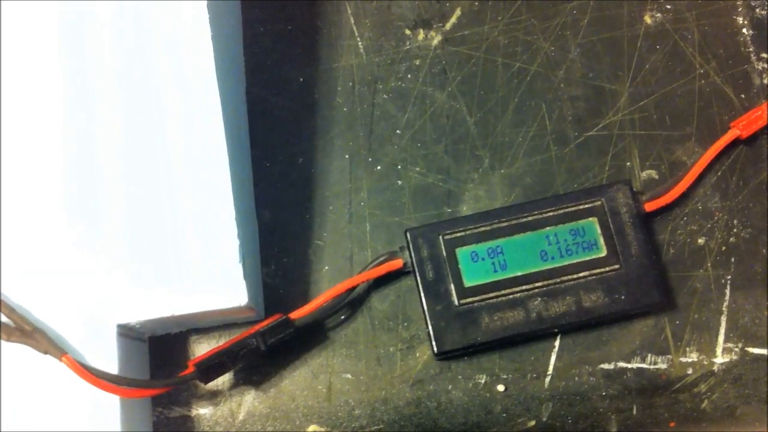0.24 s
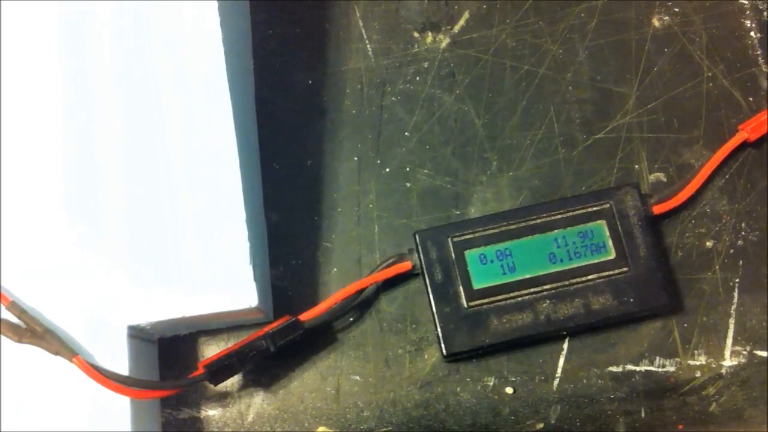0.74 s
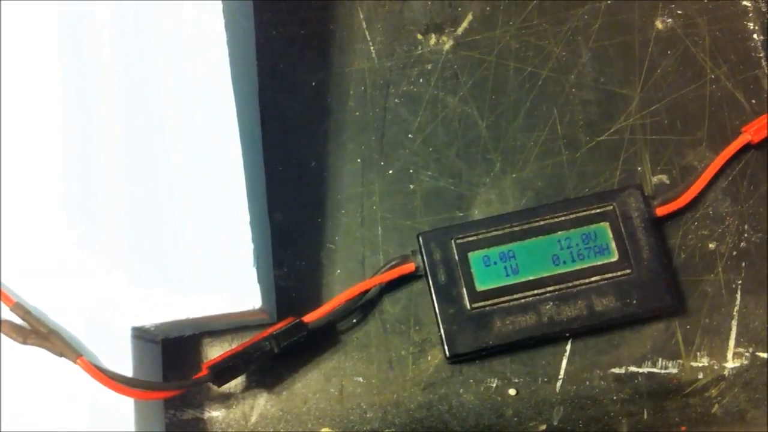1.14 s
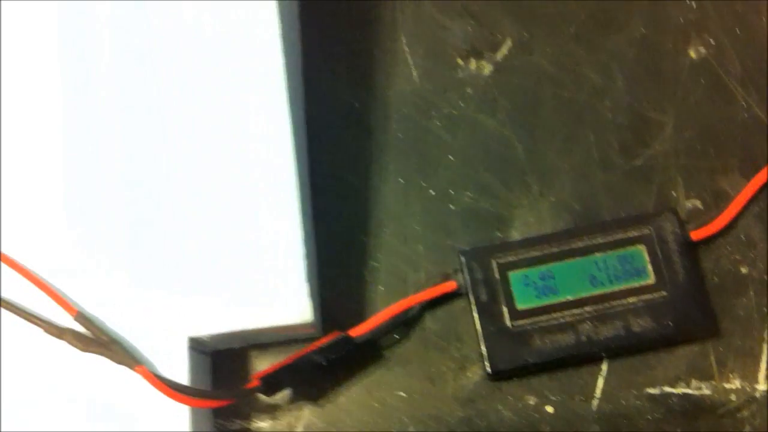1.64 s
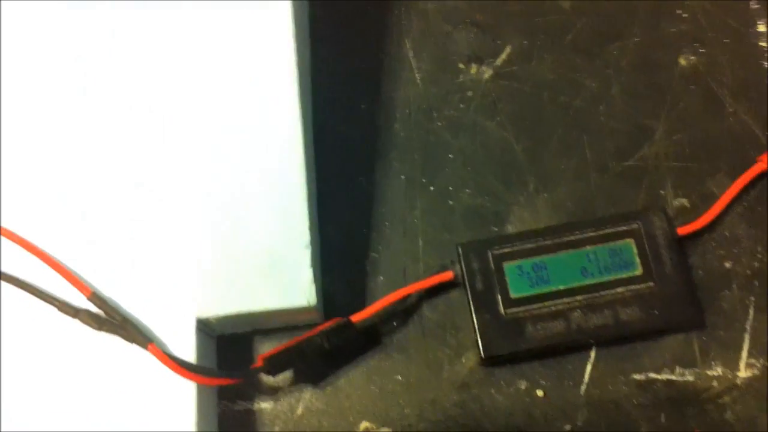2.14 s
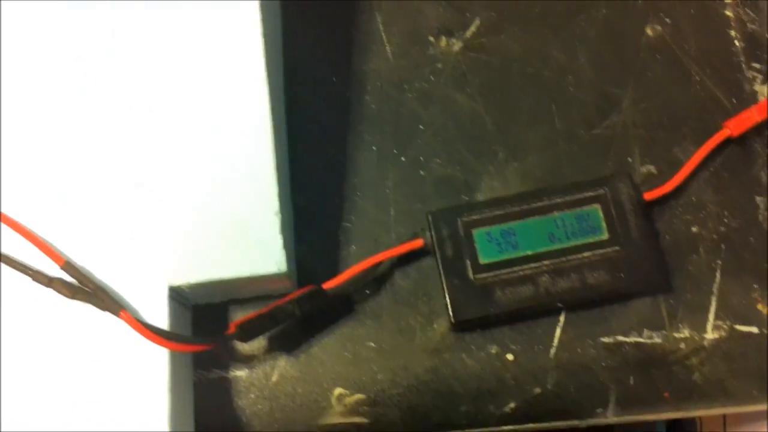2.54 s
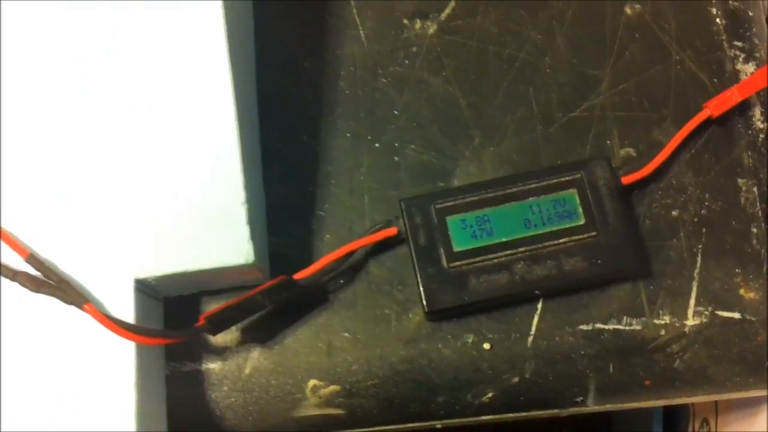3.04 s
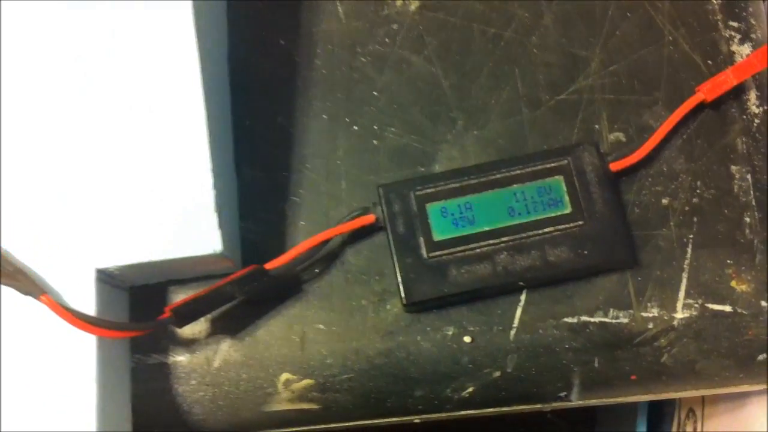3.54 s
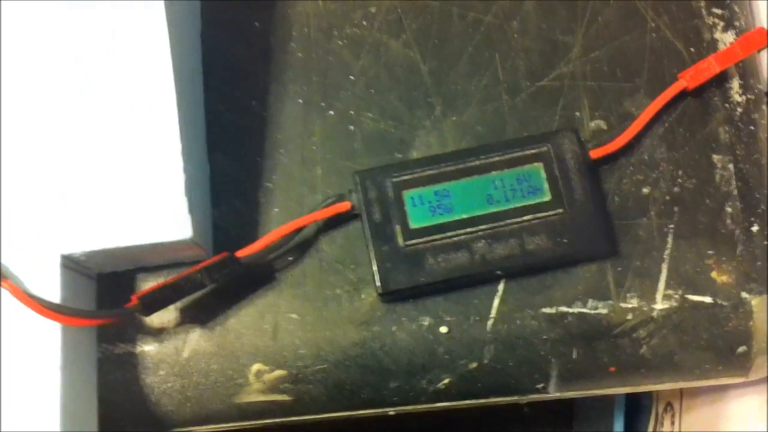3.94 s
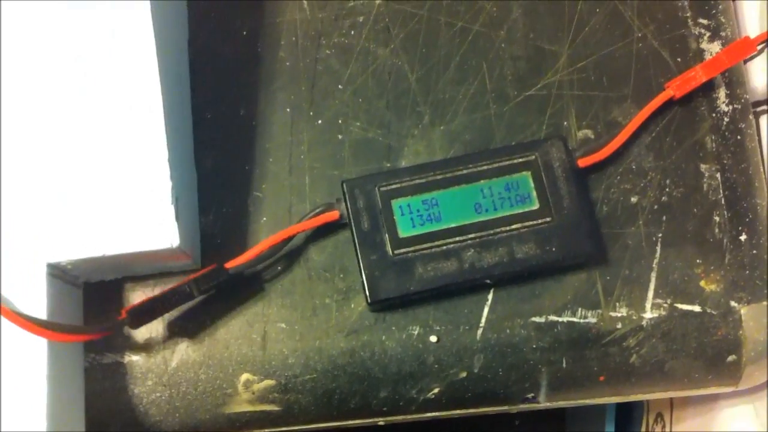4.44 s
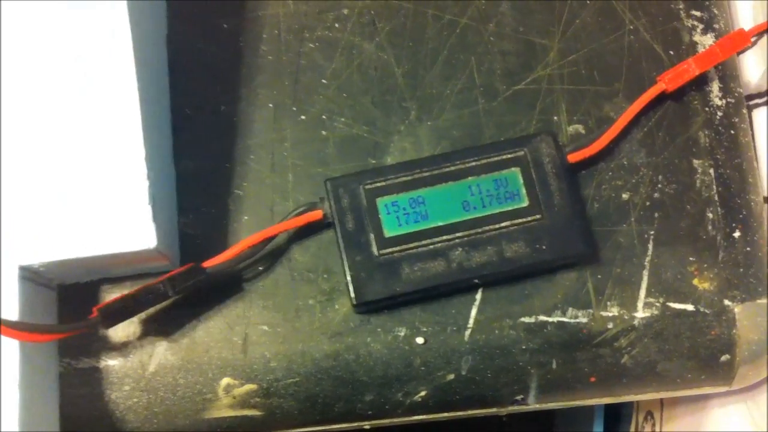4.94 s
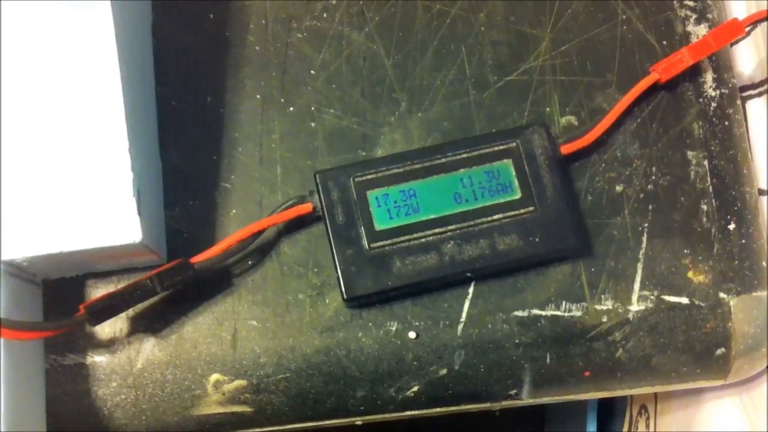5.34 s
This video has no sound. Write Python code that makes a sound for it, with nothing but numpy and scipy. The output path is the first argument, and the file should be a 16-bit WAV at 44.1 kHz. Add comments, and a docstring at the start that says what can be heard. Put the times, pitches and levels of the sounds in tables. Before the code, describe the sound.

A close mono microphone on a workbench catches faint room hum and two light rustles. Then a high controller squeal, a rattling kick and a brief rising growl launch a small ducted fan. It settles into a buzzy whine with airy hiss, then accelerates from about two and a half seconds, growing louder, brighter and windier until the cut, with puffs of air bumping the microphone.

```python
"""A close microphone at a ducted fan on a workbench, in a quiet, faintly humming workshop; a hand brushes twice.
At one second the speed controller squeals, kicks the motor and makes it growl through its housing.
As the ten-blade fan spins up, tones at multiples of the shaft rate emerge and swell as they glide through
resonances of duct and bench. The throttle then opens to full speed: the blades whine over a growing rush of air
made of shaped noise, and late on a few puffs of the wake thud on the microphone."""
import sys
import numpy as np
from scipy import signal
from scipy.fft import rfft, irfft, next_fast_len
from scipy.io import wavfile
from scipy.ndimage import uniform_filter1d, map_coordinates

SR = 44100
rng = np.random.default_rng(int(sys.argv[2]) if len(sys.argv) > 2 else 0)


def unload_audio(sound):
    """Save the sound as a 16-bit wav file, at the path given as the first command line argument."""
    columns = np.transpose(np.atleast_2d(sound))
    # keep every value between -1 and 1, then stretch to whole-number steps
    steps = np.round(np.clip(columns, -1, 1) * 32767)
    wavfile.write(sys.argv[1], SR, steps.astype(np.int16))


N = 246959

# Room noise of the quiet workshop, relative spectrum: f/Hz, density/dB
SHOP_SPECTRUM = [(30, -33), (65, -31), (105, -17), (150, -5), (200, 1), (300, -6.5), (370, -11),
                 (470, -7.5), (750, -16), (930, -12), (1200, -20.5), (4000, -20.5), (10000, -23.5),
                 (15500, -24)]
# Faint hum in the room: f/Hz, level/dB
HUM = [(130, -76.5), (173, -74.5), (198, -68.5)]
# Soft brushing of a hand: t/s, level/dB, length/s
BRUSHES = [(.102, -60.5, 0.02), (.435, -71, .02)]
# Relative spectrum of the brushing: f/Hz, density/dB
BRUSH_SPECTRUM = [(800, -14), (3800, 0), (9000, -8), (14000, -20)]
# Puffs of the fan's wake against the microphone: t/s, level/dB, length/s
PUFFS = [(4.46, -18, 0.011), (4.81, -25.5, 0.043), (5.17, -26, 0.028)]
# Relative spectrum of a puff: f/Hz, density/dB
PUFF_SPECTRUM = [(40, -47), (100, -34), (185, 4), (250, -11), (450, -17), (2000, -63)]
# Lift of air noise and weak blade tones by duct resonances: f/Hz, width/Hz, lift/dB
DUCT = [(940, 51, 3.5), (1068, 350, 6.5), (1668, 450, 6), (2716, 375, 8), (5900, 860, 4.5), (8954, 900, 0)]
# Air roar at low and at full speed, relative spectra before the duct: f/Hz, density/dB
ROAR_SLOW = [(40, -32), (85, -13), (140, 3), (350, 2), (750, 0), (2200, 5.5), (3300, -0.5), (4200, 2),
             (7000, -58)]
ROAR_FAST = [(40, -47), (85, -16.5), (130, -3), (195, 6.5), (350, 0.5), (550, -1.5), (780, -4.5),
             (2200, 0.5), (3300, -1.5), (4200, -3), (7000, -60)]
# Air hiss at low and at full speed, relative spectra before the duct: f/Hz, density/dB
HISS_SLOW = [(1800, -32), (3000, -0.5), (3800, 1.5), (5000, -1), (7200, -2.5), (9000, 0), (11000, -5),
             (14000, -3), (16000, -8.5)]
HISS_FAST = [(1800, -41), (3000, -9), (3800, -2), (5000, -2), (7200, -3), (9000, -2.5), (11000, -3),
             (14000, -3.5), (16000, -8)]
# Kicks that pull the rotor into line, strength before the housing: t/s, level/dB
KICKS = [(1.0255, -36), (1.0572, -29.5), (1.094, -30), (1.13, -15), (1.133, -31)]
# Resonances of motor mount and duct wall: f/Hz, width/Hz, gain/dB
HOUSING = [(217, 84, -15), (585, 142, 0), (1094, 113, 2), (1760, 210, -6), (2610, 310, -4),
           (6260, 1100, -17), (8350, 590, -15)]
# Torque ripple, relative strengths before the housing: multiple of the shaft rate, level/dB
RIPPLE = [(2, -9.5), (3, -5), (4, -10), (6, -4), (7, -26), (8, -1.5), (12, -6), (17, -6), (18, 1), (19, -6),
          (24, -4)]
# Surges of torque while the motor gathers speed: t/s, growl level/dB, length/s
SURGES = [(1.098, -28, 0.0092), (1.122, -18, 0.0056), (1.146, -27, 0.0055), (1.18, -23.5, 0.024),
          (1.305, -27.5, 0.033), (1.43, -34.5, 0.033)]
# Controller's switching tone: t/s, level/dB
SWITCHING = [(1.12, -37), (1.2, -34), (1.3, -38), (1.55, -40.5), (1.9, -29.5), (2.15, -29), (2.4, -32.5),
             (3.3, -33.5), (3.7, -48), (4.4, -27.5), (4.8, -44), (5.6, -30)]
# Switching sidebands: carrier multiple, shaft multiple, level/dB added at the peak of the spin-up,
# level/dB at low speed, level/dB at full speed
SIDEBANDS = [(1, 1, -52, -62, -52), (1, 6, -45, -62, -53), (1, 12, -36.5, -59, -42), (1, 18, -49, -64, -33),
             (1, -18, -42, -60, -58), (2, -18, -57, -53, -52), (2, -6, -50, -55, -56)]
# Resonances of the motor can that the commutation whine glides through: f/Hz, width/Hz, lift/dB
CAN_PEAKS = [(4300, 610, 18), (5200, 250, 7.8), (6025, 780, 18.2)]
# Tones of slightly unequal blades, before the duct: multiple of the shaft rate,
# level/dB re the roar at low speed, level/dB re the roar at full speed
UNEVEN = [(3, -18, -21.5), (4, -21, -24.5), (5, -19.5, -21), (6, -23, -32), (7, -14, -18), (9, -18, -17),
          (11, -43, -39), (17, -20, -18.5), (19, -31, -33), (21, -18, -20), (27, -32, -15), (40, -23, -24)]
# Shaft tones before resonances (1 and 2 unbalance, 6 magnet pull, 20 and 30 blade overtones):
# multiple of the shaft rate, level/dB at full speed, growth/dB per doubling of speed,
# roughness 0-1, flutter width/Hz
TONES = [(1, -32.5, 18, 0.21, 16), (2, -38.5, 13.5, 0.39, 11), (6, -38, 2, 0.19, 27),
         (20, -34.5, 14.5, 0.54, 24), (30, -32, 29, 0.44, 44)]
# Resonances of bench and duct that a shaft tone glides through: f/Hz, width/Hz, lift/dB
TONE_PEAKS = [(123, 19, 17), (156, 7.4, 7), (200, 40, 18.5), (230, 19.6, 11.5), (276.6, 11.3, 10.5),
              (341.5, 27.5, 14.5), (388, 57, 10), (613.4, 24.6, 10.5), (1018, 69, 11), (1145, 150, 12),
              (2580, 440, 13), (3470, 520, 6.5), (4620, 370, 5), (5650, 710, 13.5), (8100, 1200, 5)]
# Blade whine: t/s, level/dB
WHINE = [(1.26, -41), (1.33, -27), (1.42, -48), (1.55, -32.5), (2.1, -27), (2.55, -30.5), (2.68, -31),
         (2.78, -28), (2.85, -35), (3.2, -32.5), (3.53, -32), (3.61, -19), (3.77, -26.5), (3.85, -13.5),
         (3.92, -20), (4.04, -14.5), (4.25, -20.5), (4.42, -11), (4.52, -18.5), (4.79, -15), (4.88, -25.5),
         (5.17, -19), (5.25, -30.5), (5.6, -22)]
# Shaft speed set by the throttle: t/s, shaft rate f/Hz
THROTTLE = [(1.9, 157.5), (2.26, 163), (2.41, 166.7), (2.55, 174.5), (2.7, 184), (2.85, 199.5),
            (3.0, 212.5), (3.15, 226), (3.27, 237), (3.39, 243), (3.61, 257.4), (3.751, 266), (3.96, 274),
            (4.22, 287), (4.41, 294), (4.58, 299.6), (5.049, 305.4), (5.17, 312.5), (5.6, 323)]

SHOP_DB = -63
FULL_SPEED_HZ = 300  # shaft rate to which the growing levels refer
ROAR_DB, ROAR_GROWTH_DB = -19, 15  # at full speed, per doubling of speed
HISS_DB, HISS_GROWTH_DB = -17, 16
MOUNT_CUT_HZ = 210
GROWL_DB = -36  # under steady running
CARRIER_HZ, OCTAVE_DB = 7796.3, -48  # switching rate, level of its octave
POWER_ON_S, POWER_ATTACK_S = 1.025, 0.0025
# louder squeal while the rotor is pulled into line
ALIGN_S, ALIGN_DB, ALIGN_HOLD_S, ALIGN_RELEASE_S = 1.0445, -32, 0.031, 0.013
SPIN_START_S, SPIN_UP_S, SPIN_SHAPE = 1.047, 0.241, 1.34
COMMUTATION_DB = -49  # before the can's resonances
STEPS_PER_TURN = 36  # six pole pairs, six commutation steps each
TONES_START_S, TONES_RISE_S = 1.2, 0.04  # clear tones emerge once the rotor runs smoothly
TONE_CUT_HZ = 155  # the fan is too small to radiate below this
STANDING_WAVE_DB, STANDING_WAVES_PER_OCTAVE = 1.37, 26
TOP_HZ = 15800  # band limit of the microphone


def amp(db):
    """Decibels to gain."""
    return 10 ** (np.asarray(db) / 20)


def unit(x):
    """Scale to rms 1."""
    return x / np.sqrt(np.mean(x ** 2) + 1e-20)


def clock():
    """Time of each sample in seconds."""
    return np.arange(N) / SR


def curve(rows):
    """One value per sample from (s, value) rows."""
    return np.interp(clock(), *np.transpose(rows))


def ramp(start_s, rise_s):
    """Rises from 0 to 1 and stays there."""
    return np.clip((clock() - start_s) / rise_s, 0, 1)


def swells(rows):
    """Bell-shaped envelopes from (s, dB, length s) rows."""
    return sum(amp(db) * np.exp(-0.5 * ((clock() - s) / length) ** 2) for s, db, length in rows)


def along(points, hz):
    """Interpolate (Hz, value) points on a log frequency axis."""
    f, v = np.transpose(points)
    return np.interp(np.log(hz + 1), np.log(f), v)


def lift(hz, peaks):
    """Decibels by which resonances raise a frequency."""
    return sum(db / (1 + (2 * (hz - c) / width) ** 2) for c, width, db in peaks)


def filtered(x, response):
    """Multiply the spectrum of x by a response of frequency."""
    m = next_fast_len(N + SR // 4, True)  # zero padding leaves room for the ringing
    return irfft(rfft(x, m) * response(np.fft.rfftfreq(m, 1 / SR)), m)[:N]


def noise(level_db):
    """Noise of rms 1 with a spectrum given as a function of frequency."""
    return unit(filtered(rng.standard_normal(N), lambda hz: amp(level_db(hz))))


def flutter(width_hz):
    """Random flutter of rms 1: noise through two equal one-pole low-passes."""
    pole = np.exp(-2 * np.pi * width_hz / SR)
    return unit(signal.sosfilt([[1, 0, 0, 1, -2 * pole, pole ** 2]], rng.standard_normal(N)))


def tone(cycles, rough, width_hz):
    """A line of rms about 1 whose strength and phase are randomly shaken."""
    angle = 2 * np.pi * (cycles + rng.random())
    in_phase = (1 + rough * flutter(width_hz)) * np.sin(angle)
    quadrature = rough * flutter(width_hz) * np.cos(angle)
    return (in_phase + quadrature) * np.sqrt(2 / (1 + 2 * rough ** 2))


def spin_up():
    """Share of the throttle's speed reached as the rotor breaks loose and catches up along an S-curve."""
    elapsed = np.maximum(clock() - SPIN_START_S, 0)
    return 1 - np.exp(-(elapsed / SPIN_UP_S) ** SPIN_SHAPE)


def throttle(speed):
    """0 at low speed, 1 near full speed."""
    return np.clip((speed - 165) / 115, 0, 1)


def grown(speed, full_db, growth_db):
    """Gain that grows by a fixed step for each doubling of speed; silent at rest."""
    doublings = np.log2(np.maximum(speed, 1) / FULL_SPEED_HZ)
    return (speed > 0) * amp(full_db + growth_db * doublings)


def workshop():
    """Background: room rumble, a faint hum and a hand brushing something twice."""
    room = amp(SHOP_DB) * noise(lambda hz: along(SHOP_SPECTRUM, hz))
    hum = sum(amp(db) * tone(hz * clock(), rough=0.48, width_hz=5.0) for hz, db in HUM)
    brushing = swells(BRUSHES) * noise(lambda hz: along(BRUSH_SPECTRUM, hz))
    return room + hum + brushing


def wake():
    """Stray puffs of air thud softly on the microphone."""
    return swells(PUFFS) * noise(lambda hz: along(PUFF_SPECTRUM, hz))


def duct_flow(slow_spectrum, fast_spectrum, fast):
    """Turbulence coloured by the duct, crossfaded in power from the low-speed to the full-speed spectrum."""
    slow_flow = noise(lambda hz: along(slow_spectrum, hz) + lift(hz, DUCT))
    fast_flow = noise(lambda hz: along(fast_spectrum, hz) + lift(hz, DUCT))
    return np.sqrt(1 - fast) * slow_flow + np.sqrt(fast) * fast_flow


def air(speed):
    """Turbulent flow through the duct grows louder and changes colour with speed."""
    fast = throttle(speed)
    eddies_db = 0.59 * flutter(8.8)  # slow flutter shared by roar and hiss
    roar = grown(speed, ROAR_DB, ROAR_GROWTH_DB) * amp(eddies_db + 0.93 * flutter(42))
    hiss = grown(speed, HISS_DB, HISS_GROWTH_DB) * amp(eddies_db + 0.32 * flutter(90))
    return roar * duct_flow(ROAR_SLOW, ROAR_FAST, fast) + hiss * duct_flow(HISS_SLOW, HISS_FAST, fast)


def housing(hz):
    """Complex response of the mount and duct wall, which are too small to radiate deep bass."""
    modes = 0
    for k, (c, width, db) in enumerate(HOUSING):
        sign = (-1) ** k  # neighbouring modes have opposite signs
        modes = modes + sign * amp(db) * 1j * hz * width / (c * c - hz * hz + 1j * hz * width)
    bass_cut = -hz ** 2 / (MOUNT_CUT_HZ ** 2 - hz ** 2 + 1j * hz * MOUNT_CUT_HZ)
    return modes * bass_cut


def kicks():
    """Each current kick knocks the housing: a noise burst that decays by 60 dB in 0.11 s."""
    blows = np.zeros(N)
    for s, db in KICKS:
        age = clock() - s
        blows += (age >= 0) * amp(db - 60 * np.abs(age) / 0.11)
    blows *= rng.standard_normal(N)
    return amp(10.5) * filtered(blows, housing) + amp(-26) * blows


def growl(turns):
    """Torque ripple sweeps up through the housing's resonances, with some rattle."""
    ripple = sum(amp(db) * tone(k * turns, rough=1.0, width_hz=26) for k, db in RIPPLE)
    step_phase = (STEPS_PER_TURN * turns) % 1
    rattle = unit(amp(-14 * step_phase) * rng.standard_normal(N))  # each commutation step jolts loose parts
    ring = filtered(unit(ripple) + amp(5.5) * rattle, housing)
    # level the ringing so that the strain alone sets the loudness
    local_rms = np.sqrt(np.abs(uniform_filter1d(ring ** 2, size=700)) + 1e-9)
    strain = swells(SURGES) + amp(GROWL_DB) * ramp(start_s=1.068, rise_s=0.013)
    return strain * ring / local_rms


def controller(turns, speed):
    """The windings sing at the switching rate; commutation splits off sidebands that swell with the power drawn."""
    cycles = CARRIER_HZ * clock()
    align_gate = ramp(ALIGN_S, POWER_ATTACK_S) - ramp(ALIGN_S + ALIGN_HOLD_S, ALIGN_RELEASE_S)
    squeal_level = amp(curve(SWITCHING)) + amp(ALIGN_DB) * align_gate
    squeal = squeal_level * tone(cycles, rough=0.074, width_hz=23)
    octave = amp(OCTAVE_DB) * tone(2 * cycles, rough=0.3, width_hz=30)
    fast, running = throttle(speed), spin_up()
    power = np.gradient(running ** 2)  # spent on the rotor's energy of motion
    power = power / power.max()
    bands = np.zeros(N)
    for m, k, surge_db, low_db, full_db in SIDEBANDS:
        depth = power ** 2 * amp(surge_db) + running * amp(low_db + fast * (full_db - low_db))
        bands += depth * tone(m * cycles + k * turns, rough=0.84, width_hz=21)
    return ramp(POWER_ON_S, POWER_ATTACK_S) * (squeal + octave + bands)


def commutation(turns, speed):
    """Six pole pairs, each commutated in six steps, make the motor can whine."""
    level = amp(COMMUTATION_DB + lift(STEPS_PER_TURN * speed, CAN_PEAKS))
    whine = level * tone(STEPS_PER_TURN * turns, rough=0.41, width_hz=40)
    return ramp(TONES_START_S, TONES_RISE_S) * whine


def uneven_blades(turns, speed):
    """Weak shaft orders swell as they glide through the duct's resonances."""
    fast = throttle(speed)
    weak = np.zeros(N)
    for k, low_db, full_db in UNEVEN:
        level_db = low_db + fast * (full_db - low_db) + lift(k * speed, DUCT)
        weak += amp(level_db) * tone(k * turns, rough=1.0, width_hz=9.0)
    return grown(speed, ROAR_DB, ROAR_GROWTH_DB) * weak


def standing_waves(hz):
    """Random ripple in dB that a gliding tone meets in the room."""
    place = STANDING_WAVES_PER_OCTAVE * np.log2(hz + 1)
    return STANDING_WAVE_DB * map_coordinates(rng.standard_normal(size=1024), [place], mode="wrap")


def shaft_tones(turns, speed):
    """Ten blades whine; unbalance hums and the magnets sing, each on its multiple of the shaft rate."""
    out = amp(curve(WHINE)) * tone(10 * turns, rough=0.22, width_hz=20)
    for k, full_db, growth_db, rough, width_hz in TONES:
        hz = k * speed
        radiated = 1 / np.sqrt(1 + (TONE_CUT_HZ / (hz + 1)) ** 8)
        path = radiated * amp(lift(hz, TONE_PEAKS) + standing_waves(hz))
        out += grown(speed, full_db, growth_db) * path * tone(k * turns, rough, width_hz)
    return out * ramp(TONES_START_S, TONES_RISE_S)


def scene():
    """One shaft speed drives the motor, blades and air, heard over the workshop."""
    speed = curve(THROTTLE) * spin_up()
    turns = np.cumsum(speed) / SR
    drive = kicks() + growl(turns) + controller(turns, speed) + commutation(turns, speed)
    fan = wake() + air(speed) + uneven_blades(turns, speed) + shaft_tones(turns, speed)
    return np.tile(workshop() + drive + fan, (2, 1))


def record(dry):
    """A mono microphone feeds both channels, up to its band limit."""
    band_limit = signal.ellip(12, 0.1, 90, TOP_HZ, fs=SR, output="sos")
    return signal.sosfilt(band_limit, dry)


dry = scene()
out = record(dry)
unload_audio(out)
```